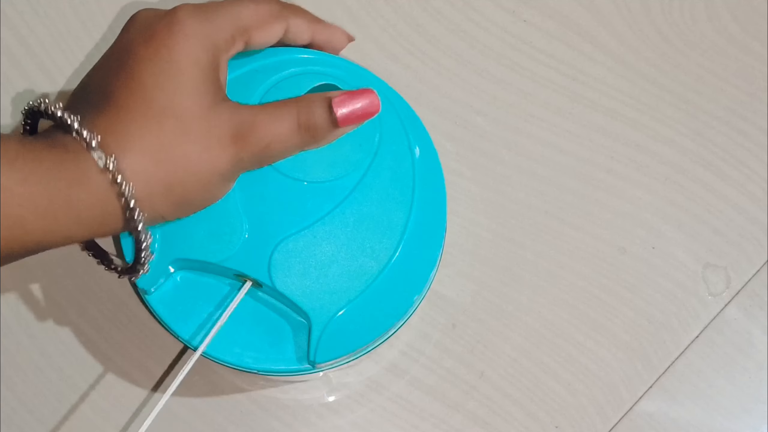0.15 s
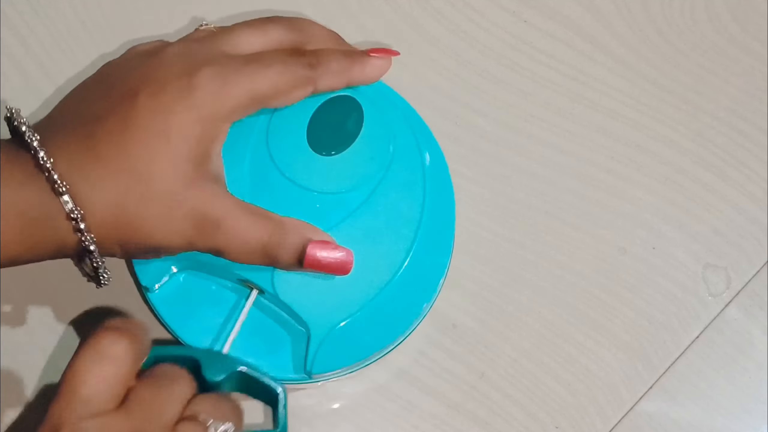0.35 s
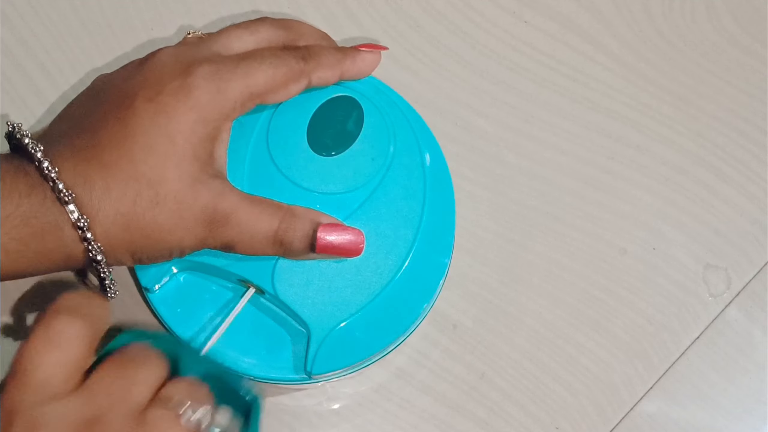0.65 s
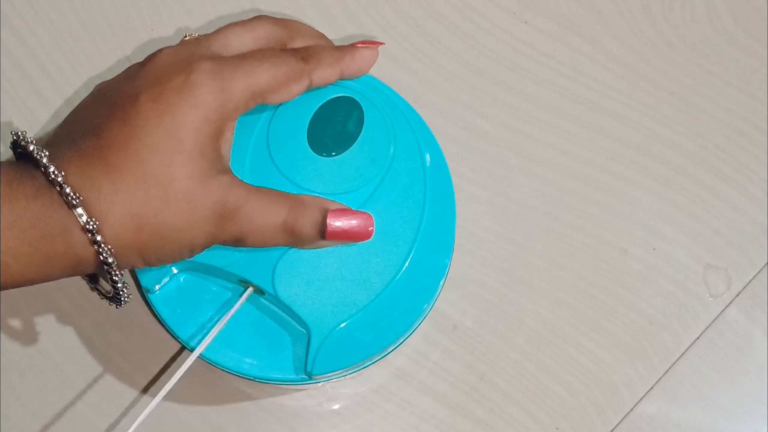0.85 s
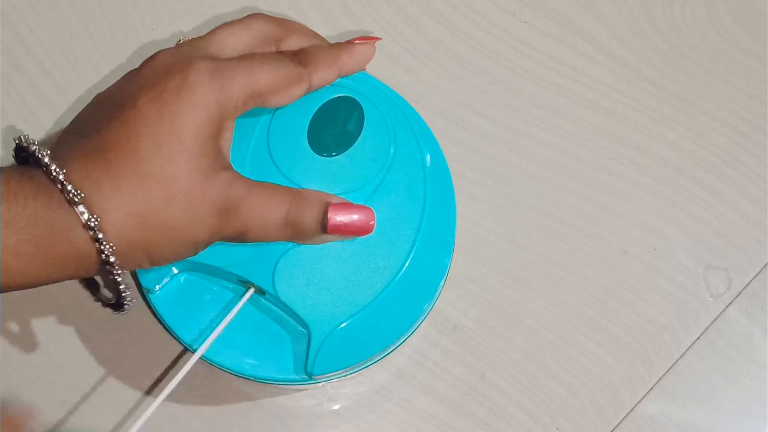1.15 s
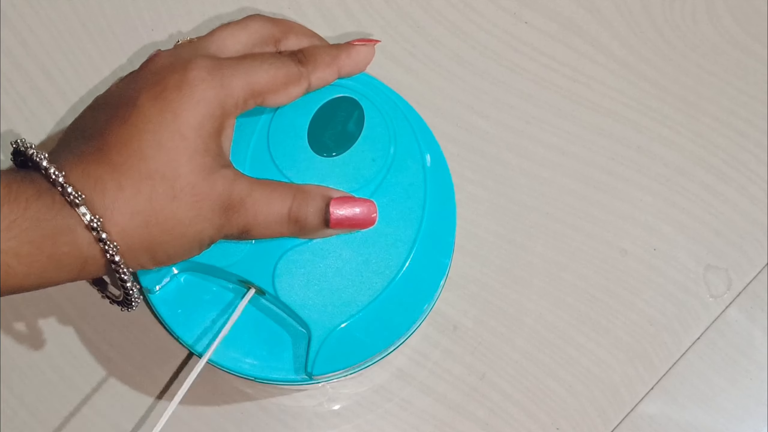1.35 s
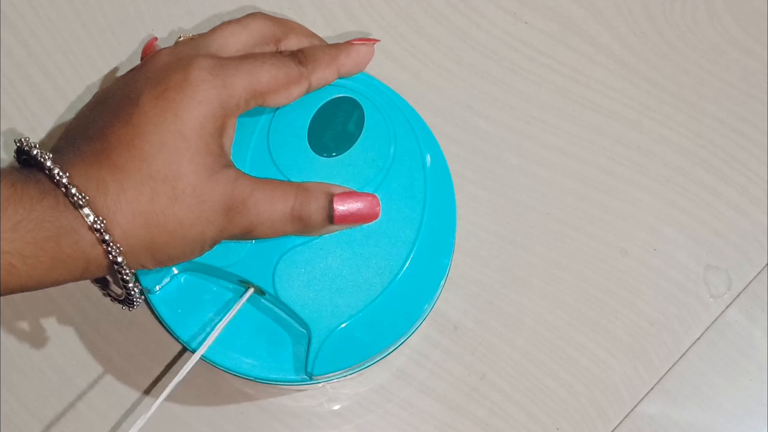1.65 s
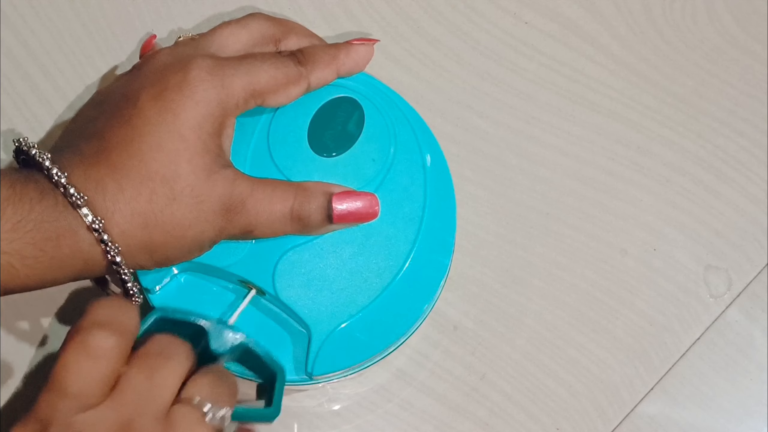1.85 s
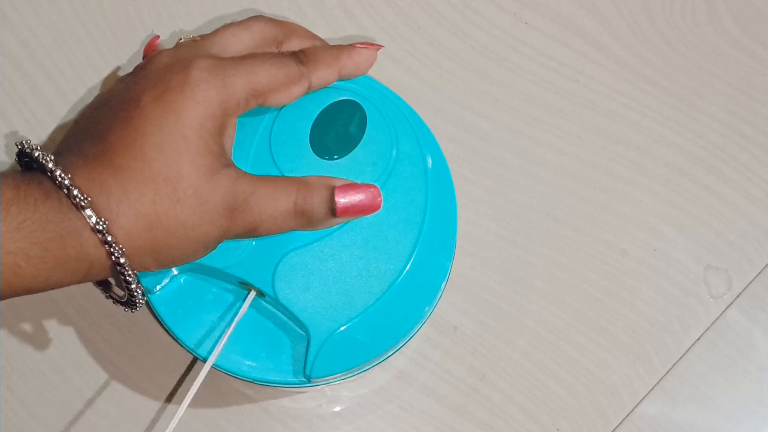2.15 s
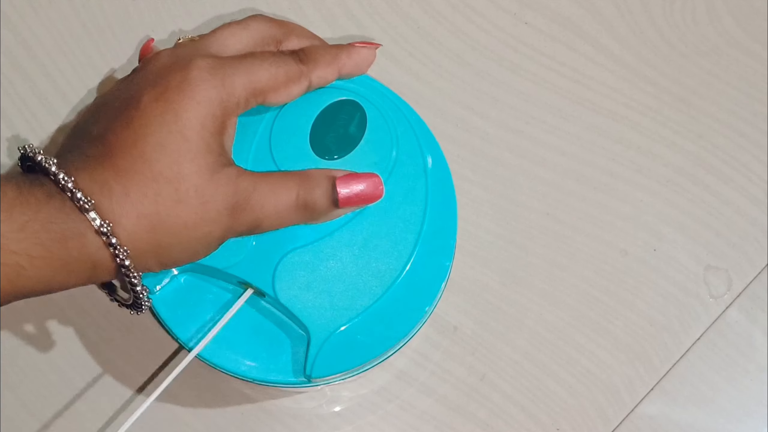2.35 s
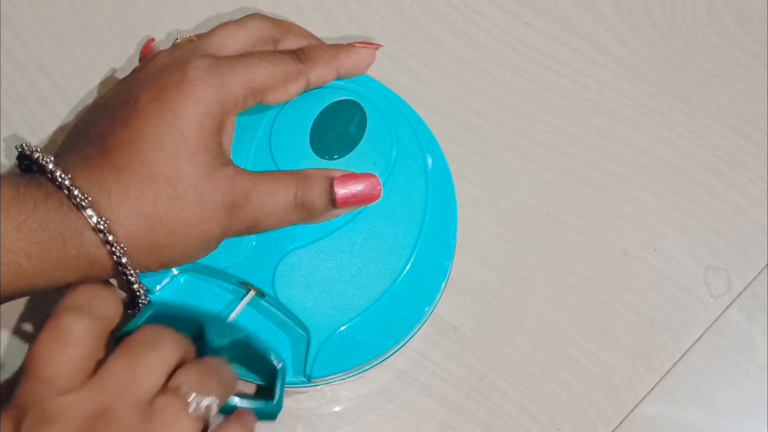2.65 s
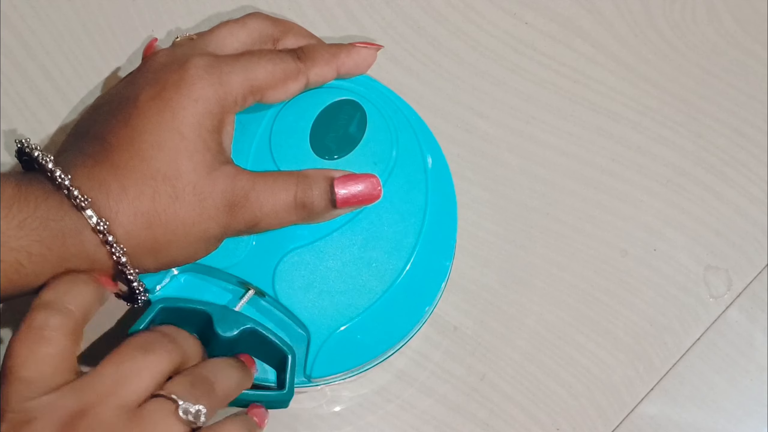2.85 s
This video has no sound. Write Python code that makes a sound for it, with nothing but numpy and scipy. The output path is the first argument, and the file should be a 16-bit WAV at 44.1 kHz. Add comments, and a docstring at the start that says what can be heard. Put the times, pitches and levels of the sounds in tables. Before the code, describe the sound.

Pull-cord chopper worked rapidly, ratchet rattling and wet lumps knocking against its plastic bowl

```python
"""A pull-cord chopper is worked seven times indoors. Over a soft noise floor the bowl rumbles on the table
and rubbed plastic creaks, filtered noise both; gears chatter and blades slap gel in waves, as trains of
random contacts, while trapped air rings as a gliding sine. Lumps knock the bowl, as decaying noise and a
pitched pulse; after each pull the spring reels the cord in with a rattling whirr of contacts and hiss.
From 0.9 s the beads of a bracelet on the hand that holds the lid ping; a short low hum and faint last
taps, narrow bands of noise, close the scene."""
import sys
import numpy as np
from scipy import signal
from scipy.fft import rfft, irfft, next_fast_len
from scipy.io import wavfile
from scipy.ndimage import uniform_filter1d

SR = 44100
rng = np.random.default_rng(int(sys.argv[2]) if len(sys.argv) > 2 else 0)


def generate_wav(sig):
    """Save sig (samples, or channels by samples) to the path in sys.argv[1] as 16-bit PCM at SR."""
    pcm = np.round(np.clip(np.atleast_2d(sig).T, -1, 1) * 32767).astype(np.int16)
    wavfile.write(sys.argv[1], SR, pcm)


N = 132300
T = np.arange(N) / SR


def amp(db):
    """Level law: decibels to amplitude gain."""
    return 10 ** (np.asarray(db) / 20)


def unit(x):
    """Power normalization: scales to rms 1."""
    return x / np.sqrt(np.mean(x ** 2) + 1e-20)


def matched(x, level):
    """Power matching: gives a sound the overall power of its level curve."""
    return unit(x) * np.sqrt(np.mean(level ** 2))


def read(points, hz):
    """Logarithmic frequency scale: interpolates a table between its points."""
    f, value = np.transpose(points)
    return np.interp(np.log(hz + 1), np.log(f), value)


def level_curve(points):
    """Envelope: relative level that moves linearly in dB between points in time."""
    return amp(np.interp(T, *np.transpose(points)))


def add(mix, s, sound):
    """Superposition: adds a sound to the mix from a time in seconds."""
    part = mix[:, max(round(s * SR), 0):][:, :sound.shape[1]]
    part += sound[:, :part.shape[1]]


# Resonances of bowl and lid. Each row: frequency in Hz, width in Hz, boost in dB.
PLASTIC_MODES = [(187, 28, 5), (304.3, 37, 6), (394, 21, 5.5), (546, 50, 3.5), (770, 110, 3), (1068, 42, 4),
                 (1447, 27, 6.5), (1646, 55, 3.5), (1985, 160, 5.5), (2364, 55, 9), (8590, 560, 4)]


def colour(x, spectrum, size=4096):
    """Minimum-phase filtering: a causal filter of a spectrum with the plastic's resonances on top."""
    hz = abs(np.fft.fftfreq(size, 1 / SR))
    db = read(spectrum, hz)
    for f, width, boost in PLASTIC_MODES:
        db = db + boost / (1 + (2 * (hz - f) / width) ** 2)
    # the phase follows from the log magnitude by a Hilbert transform
    response = np.exp(np.conj(signal.hilbert(np.log(amp(db)))))
    taps = np.fft.ifft(response).real[None, :size // 2]
    return signal.fftconvolve(x, taps, axes=1)[:, :x.shape[1]]


def coloured_noise(spectrum, length=N):
    """Source and filter: two channels of white noise shaped by a spectrum, at rms 1."""
    return unit(colour(rng.standard_normal((2, length)), spectrum))


ROOM_DB, ROOM_T60 = -11, 0.13  # room under a train of contacts, and its decay time in s


def burst(t60, room_db, size=8192):
    """Exponential decay: one contact is a dense ring that dies fast, plus a slower room tail."""
    t = T[:size]
    ring, room = rng.standard_normal((2, 2, size))
    ring = ring * amp(-60 * t / t60)
    room = room * amp(-60 * t / ROOM_T60) * np.minimum(t / 0.0049, 1)  # builds up over 4.9 ms
    return unit(ring) + amp(room_db) * unit(room)


def contacts(per_s, spread_db, level, t60, count=8):
    """Random impulse train: uneven contacts in time and strength, each at one of several spots."""
    turns = np.cumsum(per_s * np.ones(N)) / SR
    steps = np.arange(int(turns[-1]) - 1)
    draws = rng.random((len(steps), 3))
    at = np.minimum(np.searchsorted(turns, steps + draws[:, 0]), N - 1)
    strength = amp(spread_db * np.minimum(-np.log(1 - draws[:, 1]), 3))  # exponential draw in dB, capped
    chosen_spot = (draws[:, 2] * count).astype(int)
    clicks = np.zeros((count, N))
    # sparser contacts are made stronger, so the power follows the level
    clicks[chosen_spot, at] = unit(strength) * (level * np.sqrt(SR / per_s))[at]
    return sum(signal.oaconvolve(c[None], burst(t60, ROOM_DB), axes=1)[:, :N] for c in clicks)


PATCH_DB, PATCH_HZ, PATCH_S = 2.5, 500, .03  # depth and smoothing widths of the wandering colour


def wander(x, size=512):
    """Time-varying spectrum: random patches of gain, as the parts shift against each other."""
    z = signal.stft(x, nperseg=size)[2]
    field = rng.standard_normal(z.shape[1:])
    field = uniform_filter1d(field, max(round(PATCH_HZ * size / SR), 1), axis=0)
    field = uniform_filter1d(field, max(round(PATCH_S * 2 * SR / size), 1), axis=1)
    patched = z * amp(PATCH_DB * unit(field))
    return matched(signal.istft(patched, nperseg=size)[1][:, :N], x)


# Spectrum of the noise floor. Each row: frequency in Hz, relative level in dB.
FLOOR_SPECTRUM = [(20, -4), (70, 11.5), (400, -6.5), (1200, -4), (3000, -21.5), (15000, -37.5)]


def noise_floor():
    """Stationary noise: a steady, mostly low sound in the quiet room."""
    return amp(-73) * coloured_noise(FLOOR_SPECTRUM)


# Shaking of the bowl. Each row: time in seconds, level in dB.
SHAKE_LEVELS = [(0, -88), (.33, -68.5), (.95, -59.5), (2.65, -62.5), (2.85, -79)]
# Spectrum of the shaking. Each row: frequency in Hz, relative level in dB.
RUMBLE_SPECTRUM = [(20, -11), (48, -19), (68, 2), (95, -3), (150, -15), (400, -41.5), (2000, -88.5)]


def rumble():
    """Amplitude modulation: low noise rises and falls as the load shakes the bowl on the table."""
    return coloured_noise(RUMBLE_SPECTRUM) * level_curve(SHAKE_LEVELS)


# Creaks of rubbed plastic, and at the end a low hum and faint taps.
# Each row: start in seconds, rise in seconds, pitch in Hz, width in Hz, level in dB.
NARROW_RINGS = [(.009, .006, 1300, 270, -47.5), (0.032, 0.0076, 1280, 110, -49),
                (.004, .01, 1970, 150, -51), (.078, 0.038, 770, 150, -48.5), (.11, .08, 990, 510, -44.5),
                (2.72, 0.016, 403, 15, -51), (2.88, 0.0055, 1140, 260, -58), (2.944, .003, 1155, 220, -62)]


def creaks_hum_and_taps(size=16384):
    """Narrow-band resonance: creaks, and at the end a hum and taps, are brief noise around one pitch."""
    out, t, bins = np.zeros((2, N)), T[:size], np.fft.rfftfreq(size, 1 / SR)
    for s, rise, hz, width, db in NARROW_RINGS:
        resonance = 1 / (1 + (2 * (bins - hz) / width) ** 2)
        ring = irfft(rfft(rng.standard_normal((2, size))) * resonance)
        level = amp(db) * t / rise * np.exp(1 - t / rise)
        add(out, s, matched(ring * level, level))
    return out


# Spectrum of rattling parts. Each row: frequency in Hz, relative level in dB per Hz.
RATTLE_SPECTRUM = [(30, -45), (140, -18.5), (290, -1.5), (430, 1.5), (650, -12.5), (1150, 2.5), (2000, 2),
                   (2700, -12), (4200, -9.5), (6300, -21.5), (7900, -11.5), (8800, -8), (10500, -20.5),
                   (15500, -21)]
RATTLE_T60 = 0.012  # decay time of one contact in s
# Spectrum of the cord's hiss. Each row: frequency in Hz, relative level in dB per Hz.
CORD_SPECTRUM = [(30, -42.5), (300, -5.5), (1500, 6), (3000, 3), (6500, -5.5), (8800, -5), (11000, -10),
                 (15500, -6.5)]
TEETH_PER_S, TEETH_SPREAD_DB = 330, 4
RUB_DB = -6  # the cord rubs its guide while it is pulled


def gears_and_cord(drive):
    """Impact and friction noise: gear teeth chatter as contacts, the cord rubs as filtered noise."""
    chatter = contacts(TEETH_PER_S, TEETH_SPREAD_DB, drive, RATTLE_T60)
    gears = matched(colour(chatter, RATTLE_SPECTRUM), drive)
    rub = coloured_noise(CORD_SPECTRUM) * drive
    return wander(gears + amp(RUB_DB) * rub)


def spot(hz, size=8192):
    """Damped oscillation: a struck spot of the wall gives a few cycles of its own pitch."""
    t, rise_s = T[:size], 0.001
    return (t / rise_s) ** 2 * np.exp(-t / rise_s) * np.sin(2 * np.pi * hz * t)


LUMPS_PER_S, LUMPS_DB = 170, -8.5  # rate over all spots, level against the driving curve


def lumps(level, count=16):
    """Poisson process: small flung lumps tick at random on many spots, each with its own pitch."""
    hits = rng.random((count, N)) < LUMPS_PER_S / count / SR
    pitches = np.geomspace(1051, 2105, count)
    rings = [signal.oaconvolve(level * h, spot(hz))[:N] for h, hz in zip(hits, pitches)]
    gains = np.array([np.ones(count), rng.uniform(-1, 1, count)])  # of each spot in the two source signals
    return amp(LUMPS_DB) * matched(gains @ rings, level)


# Waves of gel thrown against the bowl.
# Each row: start in seconds, relative level in dB, pitch in Hz the trapped air glides and wobbles about.
GEL_WAVES = [(.154, -35, 354), (0.273, -34, 370), (.324, -25.5, 322), (.384, -37, 428), (0.509, -24, 376),
             (.544, -22.5, 347), (.653, -22.5, 366), (.705, -25.5, 404), (.814, -27, 307.4),
             (.864, -29, 598), (.942, -26.5, 310), (1.013, -23.5, 353), (1.084, -27, 406),
             (1.254, -23, 770), (1.334, -29, 368), (1.415, -23, 297), (1.464, -30.5, 458),
             (1.674, -23.5, 348.5), (1.763, -25.5, 300), (1.814, -26.5, 337), (1.954, -25.5, 328),
             (2.028, -23.5, 287.5), (2.154, -30, 398), (2.364, -30.5, 514), (2.464, -22, 638),
             (2.515, -21.5, 541), (2.564, -23.5, 392), (2.615, -33, 358)]
SLOSH_RISE_S, SLOSH_DB = 0.015, -12
POCKET_DB, POCKET_GLIDE_PER_S, POCKET_WOBBLE = -8.5, 3.3, 0.063  # glide and wobble as parts of the pitch


def sloshes(size=8192):
    """Bubble resonance: each wave swells and collapses; its air rings upward. Gives level and ring."""
    level, ring, t = np.zeros((1, N)), np.zeros((2, N)), T[:size]
    swell = (t / SLOSH_RISE_S * np.exp(1 - t / SLOSH_RISE_S)) ** 2
    for s, db, hz in GEL_WAVES:
        wobble = unit(uniform_filter1d(rng.standard_normal((2, size)), size // 32, axis=1))
        pitch = hz * (1 + POCKET_GLIDE_PER_S * (t - SLOSH_RISE_S) + POCKET_WOBBLE * wobble)
        tone = np.sin(2 * np.pi * np.cumsum(pitch, axis=1) / SR)
        add(level, s, amp(db + SLOSH_DB) * swell[None])
        add(ring, s, amp(db + POCKET_DB) * swell ** 2 * tone)
    return level[0], ring


# Spectrum of gel slaps. Each row: frequency in Hz, relative level in dB.
GEL_SPECTRUM = [(30, -36), (140, -32.5), (290, -2.5), (420, 1.5), (950, -4.5), (2000, -10.5), (2800, -13),
                (15500, -38.5)]
SLAPS_PER_S, SLAP_SPREAD_DB, SLAP_T60 = 480, 3.5, .014


def gel_slaps(level):
    """Dense impacts: blades slap the gel in a random train of short contacts."""
    slaps = contacts(SLAPS_PER_S, SLAP_SPREAD_DB, level, SLAP_T60)
    return matched(colour(slaps, GEL_SPECTRUM), level)


# How hard the gears are driven. Each row: time in seconds, relative level in dB.
GEAR_DRIVE = [(.07, -64.5), (.11, -50), (.25, -38), (.47, -43), (.55, -39.5), (.6, -46.5), (.86, -38.5),
              (1.21, -43), (1.3, -32), (1.54, -46.5), (1.62, -32), (1.91, -42.5), (2.05, -36), (2.09, -40),
              (2.52, -36), (2.74, -39), (2.84, -78.5)]
STIR_DB = -2.5  # steady stirring of the gel, against the drive


def churn():
    """Common excitation: one drive curve works gears, cord, lumps and gel, and waves add to the slaps."""
    drive = level_curve(GEAR_DRIVE)
    waves, pockets = sloshes()
    slaps = gel_slaps(waves + amp(STIR_DB) * drive)
    return slaps + pockets + lumps(drive) + gears_and_cord(drive)


# Blades and lumps hit the bowl. Each row: time in seconds, 2 ms before the strike, relative levels of thud,
# clack and crack in dB, pitch of the struck spot in Hz.
KNOCK_EVENTS = [(.224, -36.5, -35, -39.5, 1660), (.271, -29, -24, -32, 1910), (.321, -36, -23.5, -55, 1640),
                (.622, -36.5, -29.5, -41, 1900), (.64, -35, -29, -29, 1640),
                (.652, -33.5, -26.5, -45, 1610), (.709, -42, -25.5, -42, 1590),
                (.802, -32, -27.5, -58, 1680), (.821, -34, -34.5, -45, 1839),
                (.897, -39, -25.5, -35.5, 1440), (0.94, -34, -30, -37.5, 2005),
                (0.969, -36.5, -33.5, -40, 1614), (1.069, -36.5, -34.5, -42, 1850),
                (1.179, -31.5, -26.5, -53, 1986), (1.193, -35, -29, -41, 1910),
                (1.344, -38, -26.5, -55, 2324), (1.407, -29, -25, -29, 1550),
                (1.435, -34, -26.5, -33.5, 1730), (1.56, -39.5, -27, -45, 2030),
                (1.591, -22, -16.5, -22, 1420), (1.718, -42.5, -31.5, -54, 2314),
                (1.755, -33, -29, -32.5, 1397), (1.833, -33.5, -20, -38.5, 1700),
                (1.936, -29, -20, -37.5, 1237), (1.943, -32, -26, -33, 2380),
                (2.026, -29.5, -26.5, -36, 1210), (2.111, -38, -34.5, -40.5, 2260),
                (2.235, -38, -24.5, -43.5, 1590), (2.346, -32, -25.5, -33, 2350),
                (2.45, -27, -23, -36.5, 1986), (2.567, -27, -22.5, -45, 1460),
                (2.604, -26, -24, -25.5, 1920)]
# Spectra of the three parts of a blow. Each row: frequency in Hz, relative level in dB.
THUD_SPECTRUM = [(30, -27), (150, -24), (290, 1.5), (700, 2.5), (1100, -6.5), (3000, -49.5)]
CLACK_SPECTRUM = [(100, -46), (700, -16), (1200, 0), (2100, -2), (3000, -10.5), (8000, -34)]
CRACK_SPECTRUM = [(200, -40), (1800, -7.5), (3200, 6), (6500, 0), (9000, 0), (15500, -9)]
THUD_DB, THUD_T60 = -11, 0.032
CLACK_DB, CLACK_T60 = -13, 0.019
CRACK_DB, CRACK_T60 = -13.5, 0.029
PRESS_S, KNOCK_ATTACK_S, KNOCK_ROOM_DB = .002, 0.00027, -3  # delay from each row's time to the strike, attack time of a blow, and level of its room
SQUEEZE_S, SQUEEZE_DB = .003, -16  # the scrunch that swells just before a blow
SPOT_DB = 10


def knocks(size=8192):
    """Impact: a squeezed lump strikes with a thud of the bowl, a pitched clack of its wall and a crack."""
    out, t = np.zeros((2, N)), T[:size]
    for s, thud, clack, crack, hz in KNOCK_EVENTS:
        strike = s + PRESS_S
        scrunch = coloured_noise(RATTLE_SPECTRUM, size) * np.exp(-t[::-1] / SQUEEZE_S)
        add(out, strike - size / SR, amp(clack + SQUEEZE_DB + SPOT_DB) * scrunch)
        parts = [(thud + THUD_DB, THUD_SPECTRUM, THUD_T60),
                 (clack + CLACK_DB, CLACK_SPECTRUM, CLACK_T60),
                 (crack + CRACK_DB, CRACK_SPECTRUM, CRACK_T60)]
        for db, spectrum, t60 in parts:
            blow = burst(t60, KNOCK_ROOM_DB) * (1 - np.exp(-t / KNOCK_ATTACK_S))
            add(out, strike, amp(db) * unit(colour(blow, spectrum)))
        # the second source signal carries the pitched clack more weakly
        add(out, strike, amp(clack + SPOT_DB) * np.outer([1, .6], spot(hz)))
    return out


# The cord reels in.
# Each row: start in seconds, fastest moment in seconds, end in seconds, relative peak level in dB.
REWIND_EVENTS = [(0.256, .285, 0.39, -25), (.632, 0.669, 0.76, -25), (.995, 1.054, 1.145, -26),
                 (1.35, 1.428, 1.505, -24), (1.752, 1.818, 1.878, -24), (2.143, 2.203, 2.3, -25.5),
                 (2.531, 2.602, 2.712, -24)]
SLOW_DB, SPIN_UP_S, RUN_OUT_S = -8.5, .006, .018  # level at both ends against the peak, and its fades
RATTLE_PER_S, RATTLE_SPREAD_DB = 380, 3  # the rate at full speed
CORD_DB = -4


def rewind():
    """Speed-dependent impacts: the ratchet rattles faster and louder with the reel; the cord hisses."""
    level = np.zeros(N)
    for start, fastest, end, db in REWIND_EVENTS:
        arch = np.interp(T, [start, fastest, end], [-1, 0, 1]) ** 2
        fades = np.exp(-np.maximum(start - T, 0) / SPIN_UP_S - np.maximum(T - end, 0) / RUN_OUT_S)
        level += amp(db + SLOW_DB * arch) * fades
    speed = .4 + .6 * np.sqrt(level / level.max())
    clicks = contacts(RATTLE_PER_S * speed, RATTLE_SPREAD_DB, level, RATTLE_T60)
    rattle = matched(colour(clicks, RATTLE_SPECTRUM), level)
    hiss = coloured_noise(CORD_SPECTRUM) * level
    return wander(amp(0.07) * rattle + lumps(level) + amp(CORD_DB) * hiss)


# Bracelet beads touch. Each row: start in seconds, relative level in dB.
BEAD_EVENTS = [(0.9416, -24), (0.968, -31), (1.2344, -33), (1.264, -31), (1.313, -33), (1.647, -22),
               (1.6793, -20), (1.766, -24), (2.0235, -23), (2.384, -35.5), (2.4124, -30), (2.466, -29.5)]
BEAD_HZ, BEAD_DB, BEAD_RISE_S, BEAD_ROOM_DB, BEAD_GRIT = 9630, 3.5, 0.00063, -7, 0.83


def beads(size=4096):
    """Damped oscillation and reverberation: a very short, gritty ping that the room prolongs."""
    out, t = np.zeros((2, N)), T[:size]
    band = signal.butter(2, [8000, 11500], "band", fs=SR, output="sos")
    for s, db in BEAD_EVENTS:
        hz = BEAD_HZ * (1 + 0.019 * rng.standard_normal())
        ping = (t / BEAD_RISE_S) ** 2 * np.exp(-t / BEAD_RISE_S) * np.sin(2 * np.pi * hz * t)
        grit = signal.sosfilt(band, rng.standard_normal(size)) * np.exp(-t / 0.0019)
        ping = ping + BEAD_GRIT * grit
        room = unit(rng.standard_normal((2, size)) * amp(-60 * t / 0.054)) / np.sqrt(size)
        echo = signal.fftconvolve(ping[None], room, axes=1)[:, :size]
        # the direct ping is only in the first source signal, which both ports share; the echo is in both
        add(out, s, amp(db + BEAD_DB) * (np.outer([1, 0], ping) + amp(BEAD_ROOM_DB) * echo))
    return out


def scene():
    """Superposition: the chopper's sounds and the beads add up in a quiet room."""
    return noise_floor() + rumble() + creaks_hum_and_taps() + churn() + knocks() + rewind() + beads()


# Likeness of the two microphone ports. Each row: frequency in Hz, likeness from 0 to 1.
PORT_LIKENESS = [(50, .82), (330, .94), (600, .66), (800, .35), (1200, .55), (3000, .4), (5200, .4),
                 (7500, .7), (15000, .75)]
# Colour of each port. Each row: frequency in Hz, gain in dB.
LEFT_GAIN = [(300, -0.5), (1400, -2.5), (2100, -2.5), (2600, -1.5), (5800, -1.5), (6700, -14.5), (7700, -7),
             (8600, 1.5), (9700, 5), (12500, 1), (15000, -5.5)]
RIGHT_GAIN = [(300, -2), (1400, -4), (2400, -0.5), (7200, 1.5), (8700, -2), (9500, -4.5), (10200, -29.5),
              (11300, -5.5), (13000, 5), (15000, -4)]
# Phase between the ports. Each row: frequency in Hz, angle in radians by which left leads.
LEFT_LEAD = [(20, 0), (350, .1), (1100, .9), (2100, 1), (3000, 2.4), (5000, 3.3), (5900, 6.28),
             (16000, 6.28)]
EDGE_HZ = 15650  # upper band limit


def record(dry):
    """Partial coherence: two ports share part of the sound, each with its colour; then the band limit."""
    size = next_fast_len(N + 4096)
    hz = np.fft.rfftfreq(size, 1 / SR)
    a, b = rfft(dry, size)  # the two source signals
    same = np.clip(read(PORT_LIKENESS, hz), 0, 1)
    right = (same * a + np.sqrt(1 - same ** 2) * b) * np.exp(-1j * read(LEFT_LEAD, hz))
    spectra = np.array([a * amp(read(LEFT_GAIN, hz)), right * amp(read(RIGHT_GAIN, hz))])
    ports = irfft(spectra, size)[:, :N]
    lowpass = signal.firwin(255, EDGE_HZ, window=("kaiser", 9), fs=SR)
    return signal.oaconvolve(ports, lowpass[None], "same", axes=1)


dry = scene()
out = record(dry)
generate_wav(out)
```